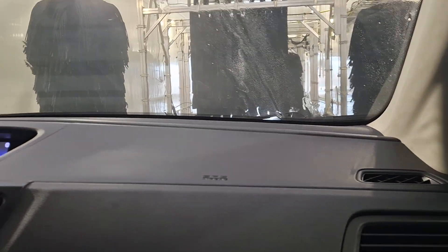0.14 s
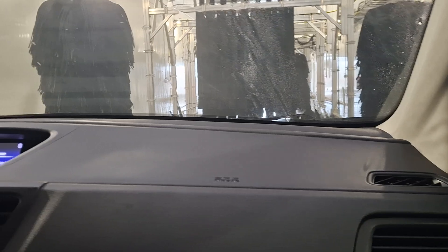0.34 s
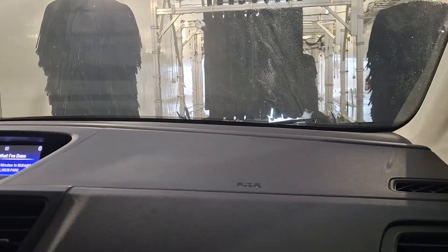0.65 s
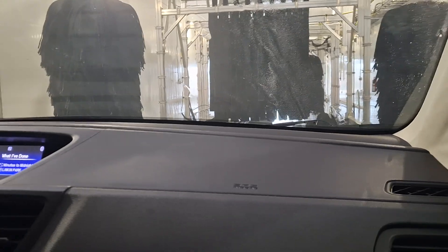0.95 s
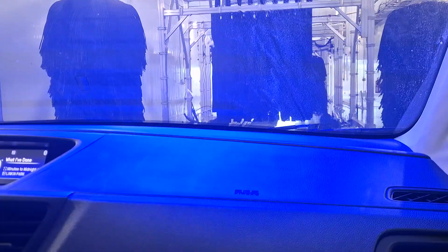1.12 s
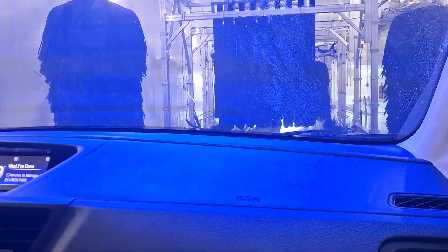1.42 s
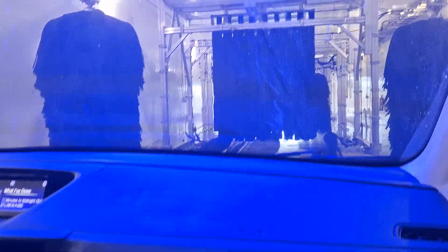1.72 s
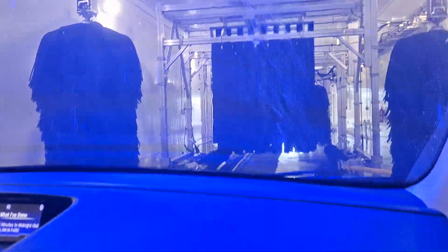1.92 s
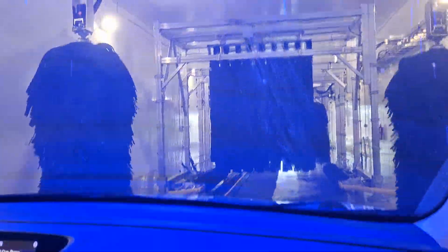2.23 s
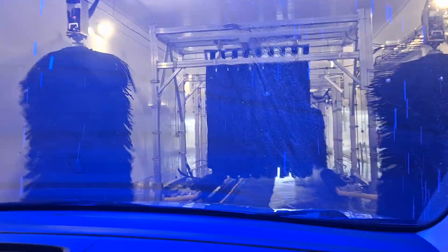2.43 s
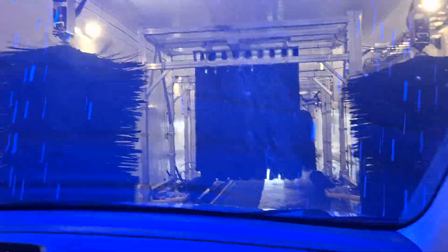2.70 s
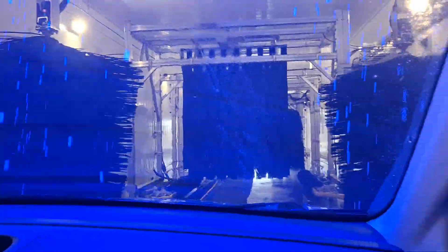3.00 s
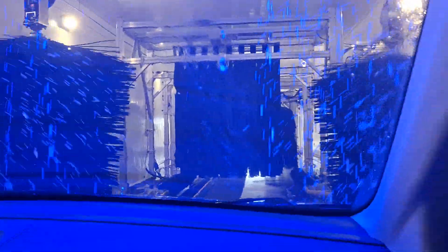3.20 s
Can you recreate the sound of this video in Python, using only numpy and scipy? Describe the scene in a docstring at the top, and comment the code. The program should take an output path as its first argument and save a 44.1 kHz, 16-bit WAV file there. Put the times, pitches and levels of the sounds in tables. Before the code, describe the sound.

Wet cloth strips swish and slap against a closed car in a wash tunnel. An early heavy wipe makes a panel drone briefly, then irregular booming slaps follow. Machinery rumbles and faint spray hisses, all heard from inside the cabin.

```python
"""Wet cloth strips drag along a closed car in a wash tunnel and slap its panels, heard from inside.
Each stroke is a swish of fizzing water, scuffing cloth and thrumming body; one heavy wipe makes a
panel drone. Each slap knocks the panel, smacks wetly and booms in the cabin air.
Machinery rumbles and distant spray hisses underneath."""
import sys
import numpy as np
from scipy import signal
from scipy.fft import rfft, irfft, next_fast_len
from scipy.io import wavfile
from scipy.ndimage import uniform_filter1d, map_coordinates

SR = 44100
rng = np.random.default_rng(int(sys.argv[2]) if len(sys.argv) > 2 else 0)


def int16_out(signal):
    """Quantize to a 16-bit WAV file."""
    q = np.round(np.clip(np.atleast_2d(signal).T, -1, 1) * 32767)
    wavfile.write(sys.argv[1], SR, q.astype(np.int16))


N = 147735
T = np.arange(N) / SR


def amp(db):
    return 10 ** (np.asarray(db) / 20)


def unit_rms(x):
    return x / np.sqrt(np.mean(x ** 2) + 1e-20)


def along(points, hz):
    """Read a curve of (Hz, value) points on a log frequency axis."""
    freqs, values = np.transpose(points)
    return np.interp(np.log(hz + 1), np.log(freqs + 1), values)


def eq(spectrum):
    """Gain response through (Hz, dB) points."""
    return lambda hz: amp(along(spectrum, hz))


def ringing(modes, hz):
    """Complex response of a set of decaying modes."""
    return sum(amp(db) * 1j * hz * pitch / (pitch * t60) ** 0.5
               / (pitch ** 2 - hz ** 2 + 1j * hz * np.log(1000) / (np.pi * t60))
               for pitch, db, t60 in modes)


def filtered(x, response):
    """Filter x by a complex response of frequency."""
    size = next_fast_len(N + SR // 2)
    return irfft(rfft(x, size) * response(np.fft.rfftfreq(size, 1 / SR)), size)[..., :N]


def wobble(per_s):
    """A smooth random curve with per_s knots a second."""
    return map_coordinates(rng.standard_normal(int(N * per_s / SR) + 4), [T * per_s])


def swell(peak_s, rise_s, hold_s, t60_s):
    """Envelope that climbs 30 dB per rise_s to its peak, holds and fades."""
    rise_db = -30 * np.clip(peak_s - T, 0, None) / rise_s
    fade_db = -60 * np.clip(T - peak_s - hold_s, 0, None) / t60_s
    return amp(rise_db + fade_db)


# Cabin width: centred lows, wide highs. Each row: frequency in Hz, left-right correlation.
CABIN_CORRELATION = [(60, .98), (200, 0.92), (350, 0.81), (600, 0.42), (900, 0.44), (1300, 0.18),
                     (15000, 0.12)]
def spread(pair, response):
    """Colour two signals and blend them into left and right as the cabin does."""
    def blend(hz):
        angle = np.arccos(np.clip(along(CABIN_CORRELATION, hz), -1, 1)) / 2
        return response(hz) * np.array([np.cos(angle), np.sin(angle)])
    mid, side = filtered(pair, blend)
    return np.array([mid + side, mid - side])


def rush(response, patchy_db):
    """Coloured stereo noise of rms 1, mottled with random gain patches in time and frequency."""
    bins = signal.stft(rng.standard_normal((2, N)), nperseg=512)[2]
    patches = uniform_filter1d(rng.standard_normal(bins.shape[1:]), size=2, axis=0)
    patches = unit_rms(uniform_filter1d(patches, size=12, axis=1))
    pair = signal.istft(bins * amp(patchy_db * patches), nperseg=512)[1][:, :N]
    return unit_rms(spread(pair, response))


# Tone of the spray. Each row: frequency in Hz, relative level in dB.
SPRAY_EQ = [(800, -28), (1400, -9), (1950, -5), (2250, 2.5), (2600, -5), (3200, -3), (3900, -0.5),
            (4800, -4.5), (5500, -8), (6500, -13.5), (11000, -14), (13000, -20.5), (15500, -22)]
# Fader ride of the spray. Each row: time in seconds, level in dB.
SPRAY_RIDE = [(0.0, -53.5), (0.53, -46), (0.62, -52), (2.51, -52.5), (2.61, -48.5), (2.86, -53.5),
              (3.35, -50)]
def spray():
    """Distant water spray hisses, a little to the right."""
    level = amp(np.interp(T, *np.transpose(SPRAY_RIDE)) + wobble(3.37))
    pan = amp([[-1.25], [1.25]])
    return level * pan * rush(eq(SPRAY_EQ), patchy_db=2.0)


# Tones of the deep and upper rumble. Each row: frequency in Hz, relative level in dB.
DEEP_EQ = [(15, -45), (28, -16.5), (55, -1.5), (77, -2.5), (100, -7), (125, -2), (160, -10), (220, -17.5),
           (400, -43), (2000, -120)]
UPPER_EQ = [(120, -38), (200, -2), (260, -2), (320, 1), (430, -2.5), (600, -11), (950, -17), (1400, -24.5),
            (2500, -40), (9000, -120)]
# Fader ride of the rumble. Each row: time in seconds, deep gain in dB, upper gain in dB.
RUMBLE_RIDE = [(0.0, -30, -42), (0.38, -31, -34.5), (0.51, -32, -33.5), (1.03, -31, -38.5),
               (1.38, -32.5, -37), (1.64, -22.5, -38.5), (1.95, -32, -37.5), (2.4, -27.5, -40),
               (2.65, -30, -37), (2.97, -28, -39.5), (3.16, -29.5, -43), (3.35, -33, -35.5)]
# Boom of the cabin air, for thuds and slaps. Each row: pitch in Hz, gain in dB, t60 in seconds.
CABIN_MODES = [(50.5, 0.5, 0.11), (78, 4, 0.43), (104, -1.5, 0.18), (150.3, -3, .15)]
def machinery(thuds_per_s=30, thud_db=-2.5):
    """Machinery rumbles in two bands while light random flaps thud in the cabin air."""
    times, deep_db, upper_db = np.transpose(RUMBLE_RIDE)
    flaps = (rng.random((2, N)) < thuds_per_s / SR) * rng.uniform(-1.12, 1, (2, N))
    thuds = unit_rms(spread(flaps, lambda hz: ringing(CABIN_MODES, hz) / (1 + 1j * hz / 250) ** 2))
    deep_gain = amp(np.interp(T, times, deep_db) + 2.5 * wobble(8.89))
    deep = rush(eq(DEEP_EQ), patchy_db=0.0) + amp(thud_db) * thuds
    upper_gain = amp(np.interp(T, times, upper_db) + 2.6 * wobble(22.18))
    return deep_gain * deep + upper_gain * rush(eq(UPPER_EQ), patchy_db=1.0)


# Resonances of the rubbed panel. Each row: centre in Hz, width in Hz, gain in dB.
DRONE_MODES = [(320, 56, -4.5), (429, 47, 0.5), (628, 40, 0), (947, 82, -11), (1420, 124, -16)]
# Envelope of the wipe, all in seconds: peak time, rise per 30 dB, hold, t60.
WIPE_SWELL = (.335, .045, .07, .6)
def heavy_wipe(level_db=-17):
    """Cloth friction drives the panel's resonances into a short drone."""
    def panel(hz):
        modes = sum((-1) ** k * amp(db) * 1j * hz * width / (centre ** 2 - hz ** 2 + 1j * hz * width)
                    for k, (centre, width, db) in enumerate(DRONE_MODES))
        return modes / (1 + (260 / (hz + 1)) ** 4)  # low cut at 260 Hz
    return amp(level_db + 0.71 * wobble(29.2)) * swell(*WIPE_SWELL) * rush(panel, patchy_db=0.9)


# Knock of the struck panel. Each row: pitch in Hz, gain in dB, t60 in seconds.
KNOCK_MODES = [(180, 16, .1), (248, 14.5, .08), (326, 16, 0.11), (448, 11, .06), (589, 4, 0.044),
               (806, 6.5, 0.043), (1100, 0, 0.036)]
# Slap cues. Each row: start in seconds, then boom, knock and smack drive in dB.
SLAP_CUES = [(.662, -20, -31.5, -55), (.775, -21.5, -38, -60), (1.25, -22, -33.5, -62),
             (1.39, -15, -30, -47), (1.515, -15, -33, -63), (1.706, -5, -19, -44),
             (2.085, -15.5, -28.5, -63), (2.185, -18, -35, -60), (2.428, -9.5, -19, -39),
             (2.545, -23, -44, -56), (2.601, -15.5, -36, -64), (2.685, -20.5, -43, -64),
             (2.81, -18, -33, -60), (2.975, -21, -41, -62)]
def slaps(rise_s=0.014, decay_s=0.026, push_hz=62):
    """A cluster of strips pushes the panel so the cabin booms, rattles it and smacks wetly."""
    t = np.arange(SR // 8) / SR
    attack = t / rise_s * np.exp(1 - t / rise_s)  # soft: the strips land one after another
    burst = attack * np.exp(-np.clip(t - rise_s, 0, None) / decay_s)
    swing = np.sin(2 * np.pi * push_hz * t) * burst
    push, rattle = np.zeros((2, 2, N + SR))
    smack = np.zeros(N + SR)
    for start_s, boom_db, knock_db, smack_db in SLAP_CUES:
        at = slice(round(start_s * SR), round(start_s * SR) + len(t))
        push[0, at] += amp(boom_db) * swing  # mid only, so the boom is centred
        rattle[:, at] += amp(knock_db) * burst * rng.standard_normal((2, len(t)))
        smack[at] += amp(smack_db) * burst
    boom = spread(push[:, :N], lambda hz: ringing(CABIN_MODES, hz))
    knock = spread(rattle[:, :N], lambda hz: ringing(KNOCK_MODES, hz) / (1 + 1j * hz / 1100) ** 2)
    smack_noise = rush(eq(SCUFF_EQ), patchy_db=1.0) + amp(-13) * rush(eq(FIZZ_EQ), patchy_db=1.5)
    return boom + knock + smack[:N] * smack_noise


# Tones of water, cloth and car body. Each row: frequency in Hz, relative level in dB.
FIZZ_EQ = [(1500, -36), (2500, -15.5), (4000, -2), (5800, -5.5), (9200, -6.5), (12000, -11.5), (15500, -19)]
SCUFF_EQ = [(500, -26.5), (850, -2), (1200, -3.5), (1500, -2), (2000, -3.5), (3000, -9), (4500, -9.5),
            (7000, -21.5), (12000, -30), (16000, -56)]
THRUM_EQ = [(120, -17), (200, -4.5), (270, -2), (330, -2.5), (450, 0.5), (560, -8), (700, -12),
            (950, -14.5), (1300, -22), (2500, -41), (9000, -120)]
# Stroke cues. Each row: peak time, rise per 30 dB, hold and t60 in seconds,
# then fizz, scuff and thrum gain in dB, and pan as left over right in dB.
STROKE_CUES = [(0.172, 0.18, 0.091, 0.42, -65, -53, -32.5, -1.5),
               (.312, .014, .02, .33, -33, -29, -28, 1.5), (0.346, 0.1454, 0.052, .5, -61, -32, -30, 0.5),
               (.5, .2, .018, .06, -43, -39, -29, 1.5), (0.632, 0.25, 0.0085, 0.24, -51.5, -39.5, -34.5, 1),
               (.884, .016, .04, .3, -46, -41, -31, 2), (.945, 0.09, 0.021, 0.29, -37.5, -40.5, -56, 1.5),
               (0.998, 0.09, .02, 0.19, -34.5, -41.5, -55, 0.5),
               (1.313, 0.2, .01, 0.24, -34.5, -37.5, -54, 0.5),
               (1.406, 0.44, .02, 0.23, -73, -49, -29.5, -0.5),
               (1.468, 0.05, 0.048, 0.18, -66, -56.5, -33, -0.5),
               (1.713, 0.09, 0.033, .35, -63, -49, -26.5, -1.5),
               (1.795, 0.11, 0.013, 0.46, -46.5, -40.5, -35, 1),
               (1.989, 0.22, 0.024, 0.22, -42, -40, -48, 1),
               (2.078, 0.42, 0.034, 0.13, -63, -49.5, -29.5, -0.5),
               (2.17, 0.16, 0.009, 0.14, -68, -52, -28.5, 0),
               (2.435, 0.03, 0.022, 0.32, -61, -49, -28.5, 1),
               (2.517, 0.18, 0.031, .3, -48, -44.5, -35.5, 2),
               (2.593, 0.07, 0.044, 0.34, -48.5, -46, -38.5, 2),
               (2.69, 0.14, 0.034, 0.28, -45.5, -42.5, -34.5, 1.5),
               (2.795, .1, 0.017, 0.22, -57, -50, -27.5, 0),
               (3.193, 0.29, 0.018, 0.47, -51, -50, -30.5, -0.5),
               (3.328, 0.37, .02, .2, -51.5, -58, -39, 0)]
def cloth_strokes(scuff_gain_db=3.5):
    """Dragging strips swell, hold and fade: water fizzes, cloth scuffs, the body thrums."""
    power = np.zeros((3, 2, N))  # layer, channel, sample
    for *timing, fizz_db, scuff_db, thrum_db, pan_db in STROKE_CUES:
        gains = amp([[fizz_db], [scuff_db], [thrum_db]]) * amp([pan_db / 2, -pan_db / 2])
        power += (gains[..., None] * swell(*timing)) ** 2
    fizz = rush(eq(FIZZ_EQ), patchy_db=2.5) * amp(0.48 * wobble(39.4))
    # scuff_gain_db sets the overall level of the cloth scuff.
    scuff = rush(eq(SCUFF_EQ), patchy_db=2.5) * amp(scuff_gain_db + 1.2 * wobble(30.24))
    thrum = rush(eq(THRUM_EQ), patchy_db=1.0) * amp(1.12 * wobble(30))
    return (np.sqrt(power) * [fizz, scuff, thrum]).sum(axis=0)


def scene():
    """Cloth on the car up front, over a bed of rumble and spray."""
    return cloth_strokes() + heavy_wipe() + slaps() + machinery() + spray()


# Microphone balance. Each row: frequency in Hz, left over right in dB.
MIC_BALANCE = [(30, 2), (70, 2.7), (130, -1), (300, 0), (600, 0), (1200, -.5), (2500, .5)]
# Microphone phase offset. Each row: frequency in Hz, lead of right over left in radians.
MIC_PHASE = [(40, 0.67), (90, 0.5), (200, 0.2), (350, 0), (600, -0.3), (1000, -2), (1700, -4.5), (3000, -7),
             (6000, -12), (15000, -22)]
def record(dry):
    """Two microphone ports differ in level and phase and pass only 8 Hz to 15741 Hz."""
    def ports(hz):
        tilt = np.log(amp(along(MIC_BALANCE, hz))) - 1j * along(MIC_PHASE, hz)
        return np.exp([tilt / 2, -tilt / 2]) * (hz > 8) * (hz < 15741)
    return filtered(dry, ports)


dry = scene()
out = record(dry)
int16_out(out)
```